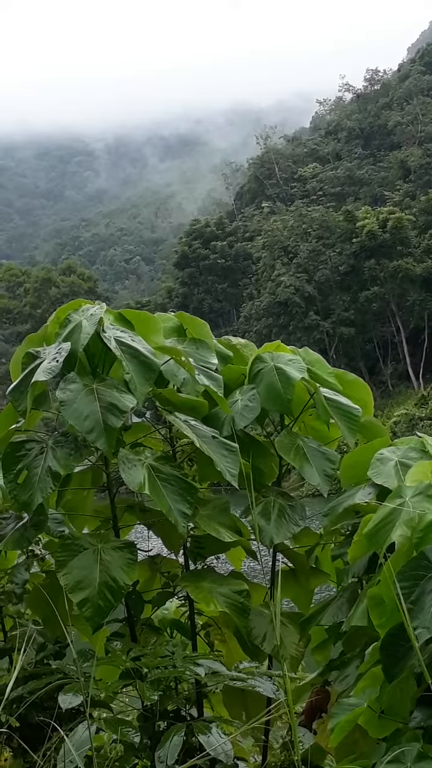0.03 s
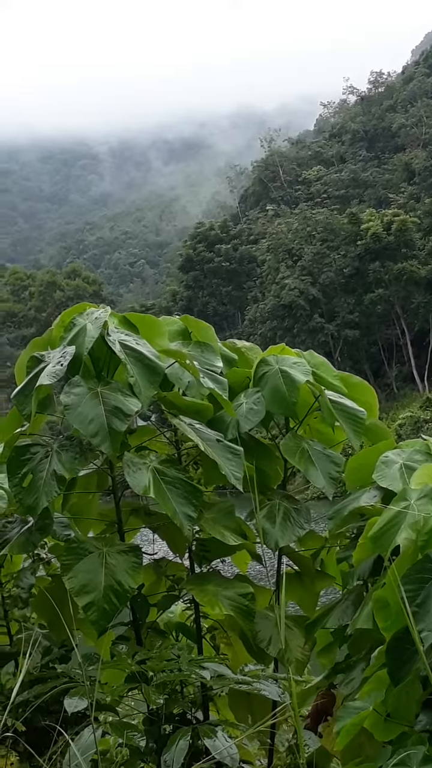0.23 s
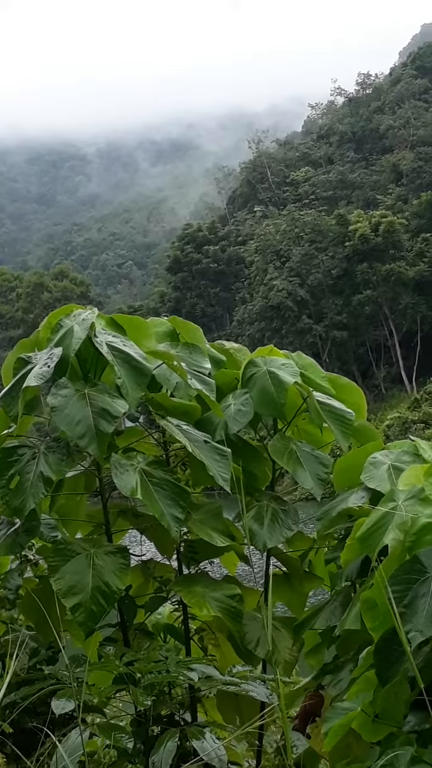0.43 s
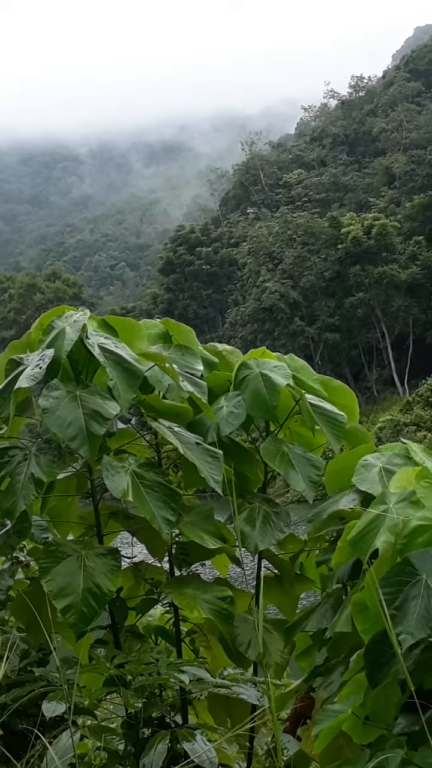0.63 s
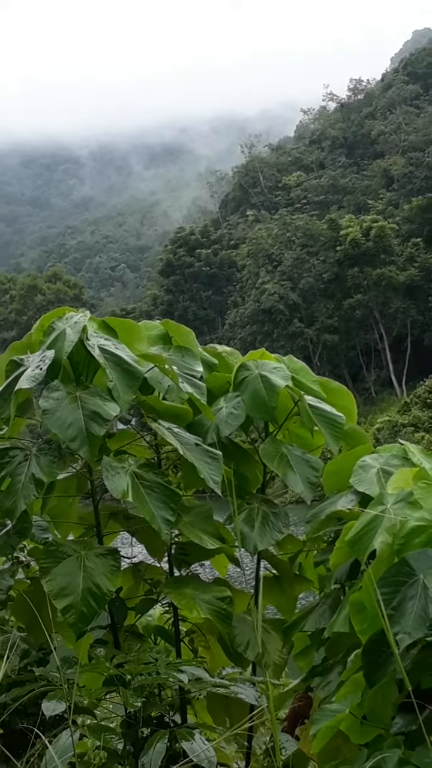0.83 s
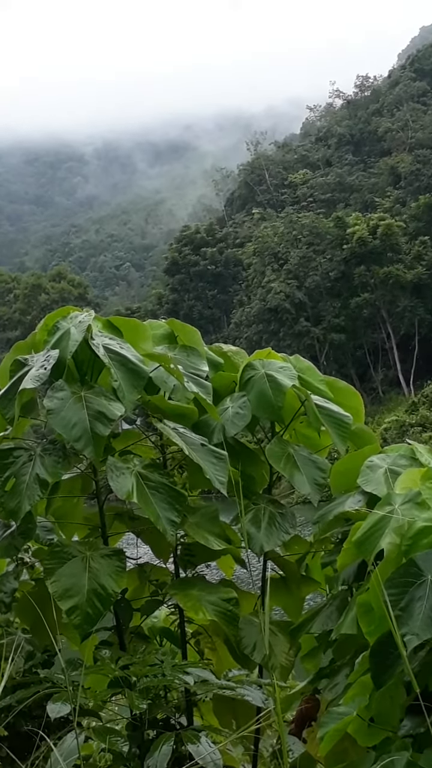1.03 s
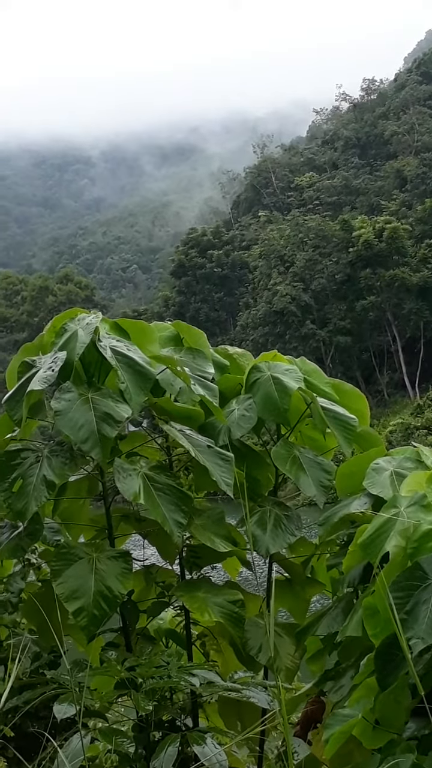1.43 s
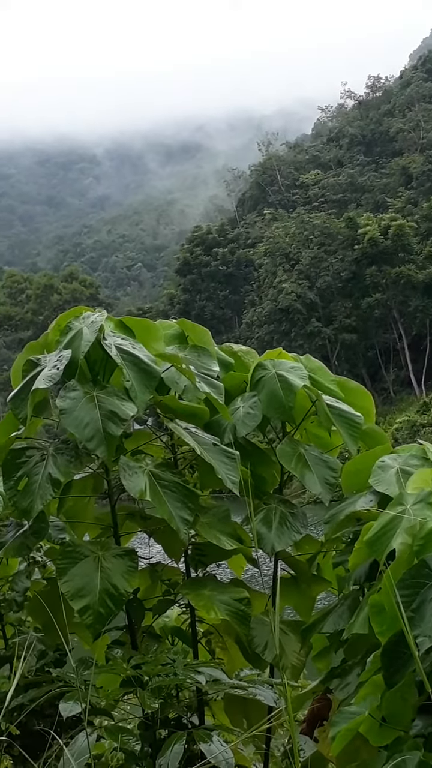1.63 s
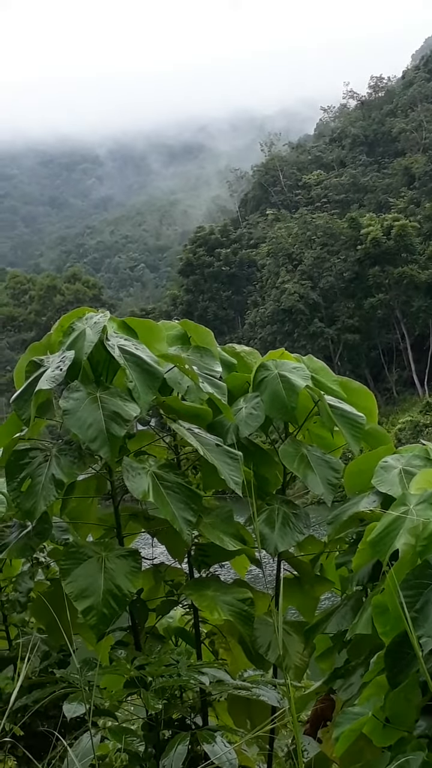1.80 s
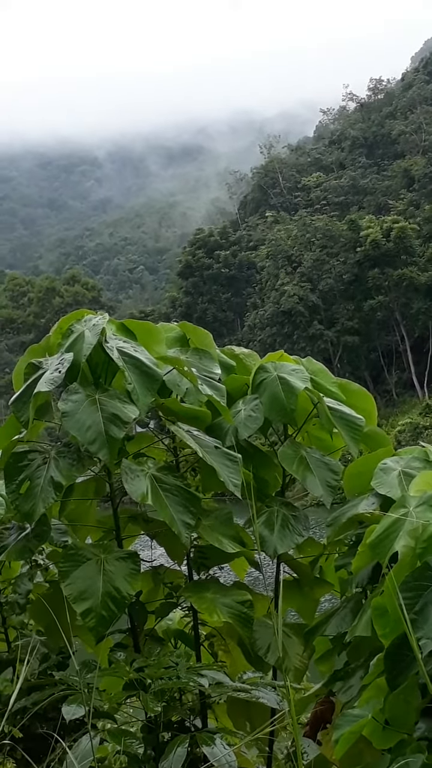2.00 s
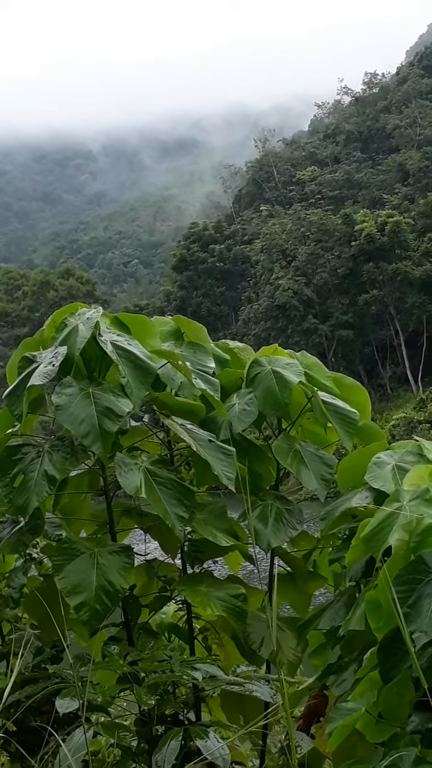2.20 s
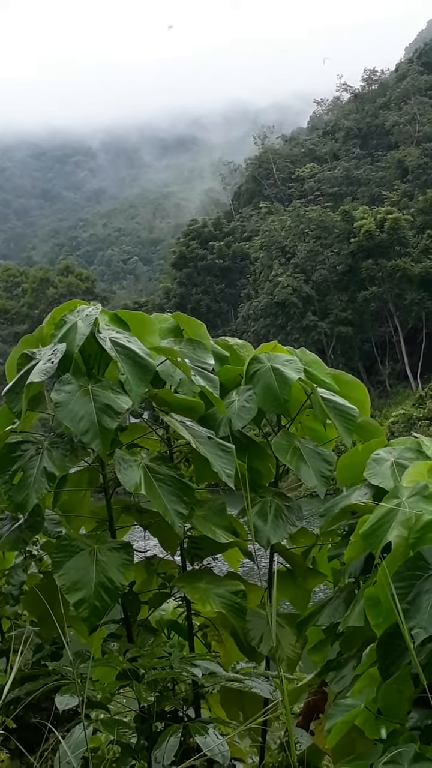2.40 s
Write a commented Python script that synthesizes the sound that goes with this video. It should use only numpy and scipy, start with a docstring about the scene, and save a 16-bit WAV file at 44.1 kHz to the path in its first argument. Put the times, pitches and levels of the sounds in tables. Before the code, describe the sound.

Soft handling thuds come unevenly from the hand holding the microphone, thinning to a few faint bumps in the second half. Underneath are a low grip rumble and the very faint, even hiss of far rain on a wooded slope.

```python
"""From the start, faint far drizzle hisses over a forested hillside, heard through a hand-held microphone.
The holding hand rumbles throughout, and the microphone's own thin hiss lies on top.
From 0.08 s fingers shift on the case with dull bumps and short rubs; one tiny tick falls at 0.38 s.
After about 1.5 s the fingers settle: the rumble eases and only three faint bumps follow."""
import sys
import numpy as np
from scipy import signal
from scipy.fft import rfft, irfft
from scipy.io import wavfile

SR = 44100
rng = np.random.default_rng(int(sys.argv[2]) if len(sys.argv) > 2 else 0)


def wrap_up_sound(samples):
    """Save the sound to the file named by the first command line argument, as 16-bit audio."""
    columns = np.atleast_2d(samples).T
    # keep every value between -1 and 1, then stretch to whole-number steps
    tamed = np.clip(columns, -1, 1)
    steps = np.round(tamed * 32767).astype(np.int16)
    wavfile.write(sys.argv[1], SR, steps)


N = 112454
TIME = np.arange(N) / SR

# Noise spectra. Each row: frequency in Hz, relative density in dB.
RAIN_SPECTRUM = [(200, -4.5), (500, 3.5), (850, 0), (1300, -2.5), (2700, -5), (4500, -8.5), (7000, -15),
                 (10000, -27), (16000, -53)]
HISS_SPECTRUM = [(2000, -0.5), (5000, -41.5), (8000, -10.5), (10500, -16), (12500, -9), (14000, -5),
                 (15500, -3)]
RUMBLE_SPECTRUM = [(20, -13), (28, -26.5), (40, -6.5), (65, -3), (97, 1), (150, -5), (210, -14),
                   (290, -17.5), (450, -32), (900, -52.5)]
# Stereo width. Each row: frequency in Hz, side level against mid in dB.
RAIN_WIDTH = [(300, -35.5), (700, -16.5), (1400, -20), (2800, -11.5), (5000, -8), (9000, -2.5)]
HISS_WIDTH = [(3000, -8), (8000, -5.5), (10500, 2.5), (12500, -4.5), (15000, -10)]
# Grip rumble over time. Each row: time in seconds, level in dB.
RUMBLE_ENVELOPE = [(0, -58), (.7, -56), (1.1, -57), (1.5, -54.5), (1.7, -60), (2.55, -58)]
# Resonances of the rubbed case. Each row: frequency in Hz, bandwidth in Hz, gain in dB.
CASE_MODES = [(189, 94, -0.5), (261, 24, 7.5), (330, 22, -36), (575, 200, -25)]
# Finger rubs. Each row: centre in seconds, half length in seconds, level in dB.
FINGER_RUBS = [(0.196, 0.041, -50), (0.697, 0.06, -54.5), (1.471, 0.016, -53.5)]
# Finger bumps. Each row: start in seconds, thud level in dB, settled pitch in Hz, starting pitch in Hz,
# swell time in seconds, knock gain in dB, knock pitch in Hz.
FINGER_BUMPS = [(0.084, -48.5, 163, 367, 0.011, -40, 507), (0.177, -42, 175, 202, 0.011, -61, 520),
                (0.2153, -24.5, 56, 499, 0.0044, -32.5, 450), (0.2387, -21.5, 246, 250, 0.0032, -33.5, 746),
                (0.3516, -33.5, 90, 241, 0.0053, -38, 410), (0.381, -48, 150, 282, 0.0016, -53, 574),
                (0.4239, -31, 166, 122, 0.0044, -45.5, 760), (0.589, -33.5, 136, 156, 0.0049, -31.5, 347),
                (0.6795, -33.5, 143, 100, 0.0077, -21, 414), (0.939, -43.5, 94, 140, .006, -56, 500),
                (1.040, -42.5, 79, 170, 0.0075, -70, 500), (1.1362, -26, 126, 177, 0.003, -38.5, 550),
                (1.258, -46, 164, 350, 0.0061, -56, 450), (1.4315, -40.5, 128, 288, 0.0025, -43.5, 550),
                (1.4522, -26.5, 145, 370, 0.0057, -29.5, 496), (1.518, -32, 111, 116, 0.0045, -65, 360),
                (1.77, -45.5, 99, 151, 0.0053, -60, 500), (1.982, -47, 131, 223, 0.0032, -74, 495),
                (2.276, -46.5, 95, 131, 0.0053, -62, 500)]


def from_db(db):
    """Decibels to gain."""
    return 10 ** (np.asarray(db) / 20)


def unit_rms(x):
    """Scale to rms 1."""
    return x / np.sqrt(np.mean(x ** 2) + 1e-20)


def colour(x, spectrum):
    """Filter by (Hz, dB) points on a log frequency axis."""
    hz, db = np.transpose(spectrum)
    bins_hz = np.maximum(np.arange(N // 2 + 1) * SR / N, 1)
    gain_db = np.interp(np.log(bins_hz), np.log(hz), db)
    return irfft(rfft(x) * from_db(gain_db), N)


def noise(spectrum):
    """Coloured noise, rms 1."""
    return unit_rms(colour(rng.standard_normal(N), spectrum))


def wide_noise(spectrum, width):
    """Coloured stereo noise; width depends on frequency."""
    mid = noise(spectrum)
    side = colour(noise(spectrum), width)
    return mid + side * np.array([[1], [-1]])


def drift(rate_hz):
    """Smooth random wander, rms 1."""
    r = np.exp(-2 * np.pi * rate_hz / SR)
    return unit_rms(signal.lfilter([1], [1, -2 * r, r * r], rng.standard_normal(2 * N))[N:])


def butter(x, hz, kind, order=2):
    """Butterworth low- or high-pass."""
    return signal.sosfilt(signal.butter(order, hz, kind, fs=SR, output="sos"), x)


def resonate(x, hz, width_hz):
    """One resonance, peak gain 1."""
    r = np.exp(-np.pi * width_hz / SR)
    feedback = [1, -2 * r * np.cos(2 * np.pi * hz / SR), r * r]
    return signal.lfilter(np.array([1, 0, -1]) * (1 - r * r) / 2, feedback, x)


def swell(t, peak_s):
    """Envelope that rises to 1 and dies away."""
    return (t / peak_s * np.exp(1 - t / peak_s)) ** 2


def microphone_hiss(level_db=-74.5):
    """Thin self-noise of the microphone."""
    return from_db(level_db) * wide_noise(HISS_SPECTRUM, HISS_WIDTH)


def far_rain(level_db=-71.5):
    """Countless far drops on leaves merge into an even hiss."""
    return from_db(level_db) * wide_noise(RAIN_SPECTRUM, RAIN_WIDTH)


def hand_rumble(waver_db=1.1):
    """The grip rumbles unsteadily, calmer once the fingers settle."""
    level_db = np.interp(TIME, *np.transpose(RUMBLE_ENVELOPE))
    return from_db(level_db + waver_db * drift(rate_hz=36)) * noise(RUMBLE_SPECTRUM)


def case_tick(start_s=0.38, decay_s=0.0012, gain_db=-66):
    """The case ticks once: a tiny burst of bright noise."""
    envelope = (TIME > start_s) * np.exp(-np.minimum(np.abs(TIME - start_s) / decay_s, 20))
    return from_db(gain_db) * butter(envelope * rng.standard_normal(N), hz=6500, kind="high")


def finger_rubs(slips_per_s=240):
    """Skin slips in quick uneven steps and sets the case ringing."""
    slips = (rng.random(N) < slips_per_s / SR) * rng.choice([-1, 1], N) + 1e-18
    ringing = sum(from_db(db) * resonate(slips, hz, width_hz) for hz, width_hz, db in CASE_MODES)
    pressure = sum(from_db(db) * np.exp(-np.minimum(((TIME - centre_s) / half_s) ** 2, 20))
                   for centre_s, half_s, db in FINGER_RUBS)
    return pressure * unit_rms(butter(ringing, hz=600, kind="low", order=4))


def finger_bumps(settle_s=0.00429, push_db=-13.5, knock_width_hz=423):
    """Each contact knocks, then gives a damped thud whose pitch settles as the finger flattens."""
    out = np.zeros(N)
    for start_s, thud_db, settled_hz, start_hz, swell_s, knock_db, knock_hz in FINGER_BUMPS:
        t = np.clip(TIME - start_s, 0, 0.2)
        cycles = settled_hz * t + (start_hz - settled_hz) * settle_s * (1 - np.exp(-t / settle_s))
        thud = swell(t, swell_s) * np.sin(2 * np.pi * cycles)
        push = from_db(push_db) * swell(t, peak_s=0.0035)   # the whole case gives way
        knock = np.exp(-np.pi * knock_width_hz * t) * np.sin(2 * np.pi * knock_hz * t)
        knock = butter(knock, hz=1.336 * knock_hz, kind="low", order=4)   # soft skin dulls it
        out += from_db(thud_db) * (thud - push) + from_db(knock_db) * knock
    return out


def scene():
    """Wide rain and hiss around centred handling sounds."""
    return far_rain() + microphone_hiss() + hand_rumble() + finger_bumps() + finger_rubs() + case_tick()


def record(dry):
    """Cut the deepest bass and the top treble."""
    cutoff_hz = 15720
    low_pass = signal.ellip(14, 0.1, 80, cutoff_hz, fs=SR, output="sos")
    return signal.sosfilt(low_pass, butter(dry, hz=40, kind="high", order=3))


dry = scene()
out = record(dry)
wrap_up_sound(out)
```